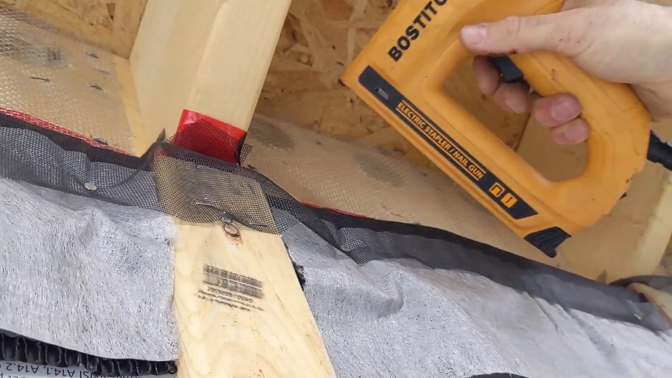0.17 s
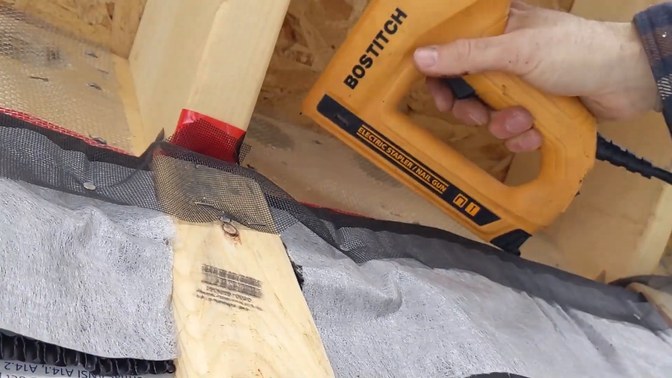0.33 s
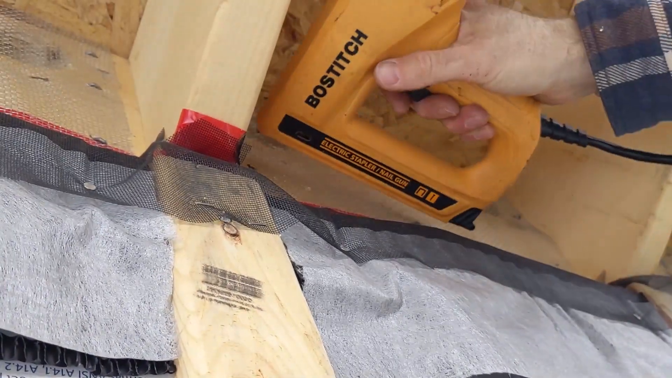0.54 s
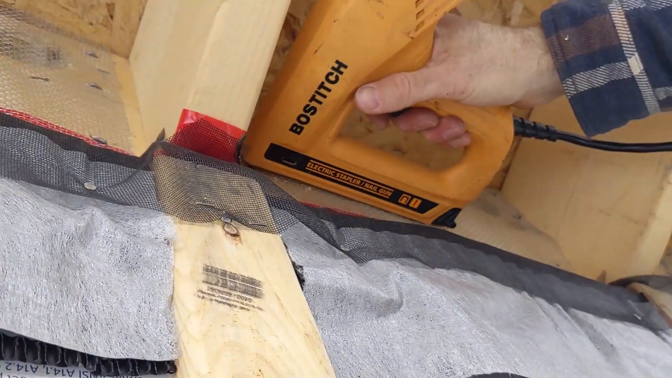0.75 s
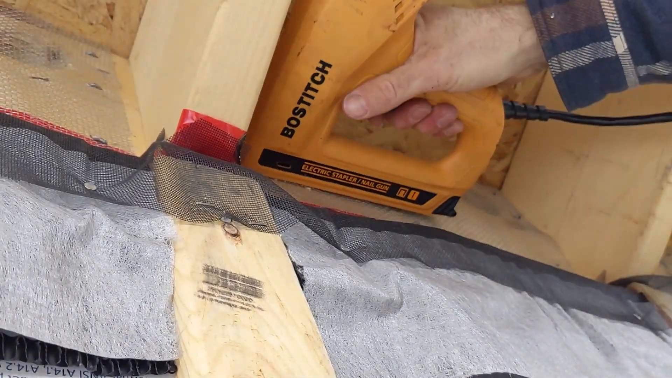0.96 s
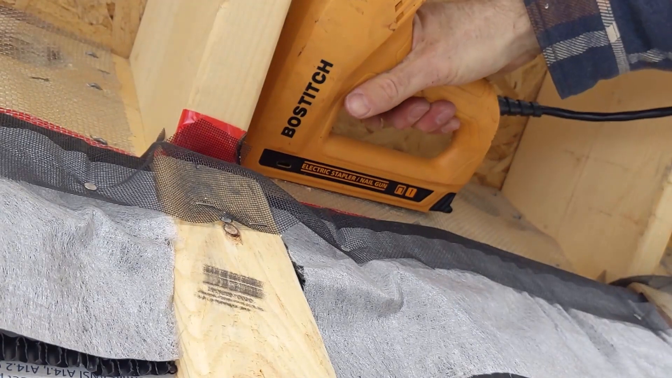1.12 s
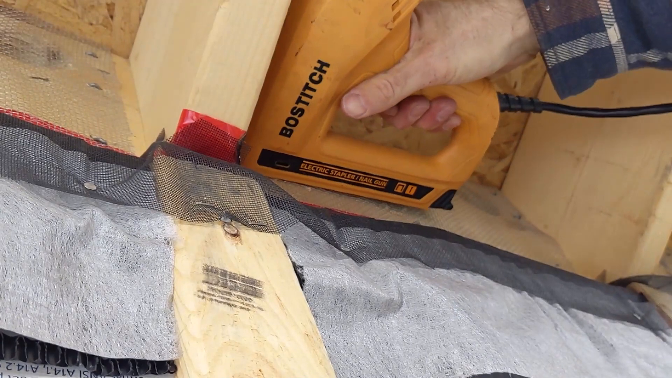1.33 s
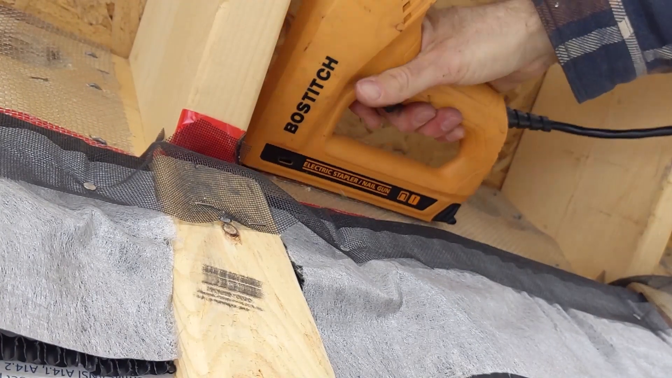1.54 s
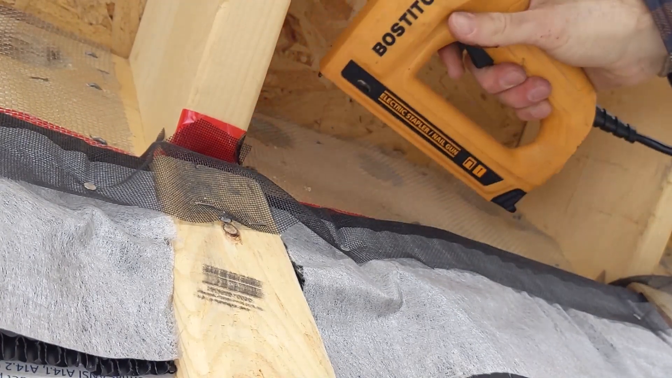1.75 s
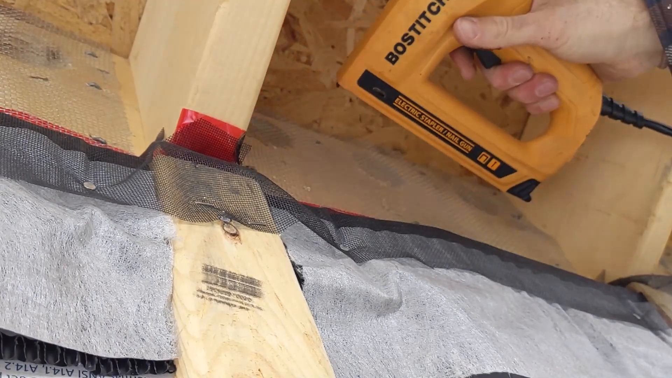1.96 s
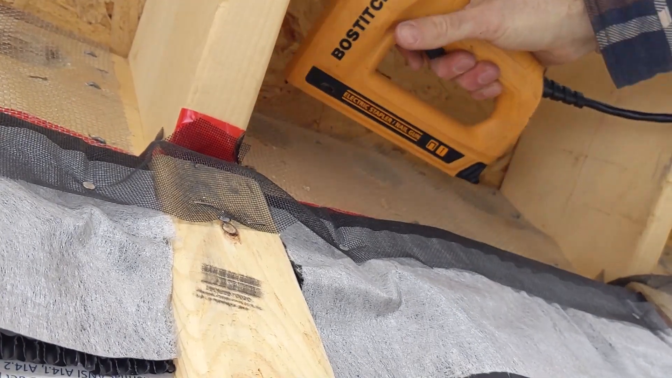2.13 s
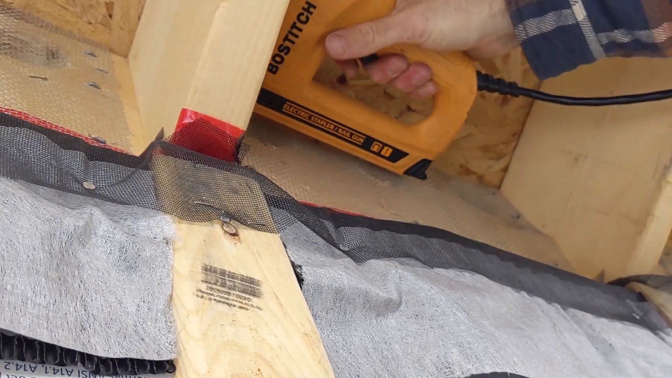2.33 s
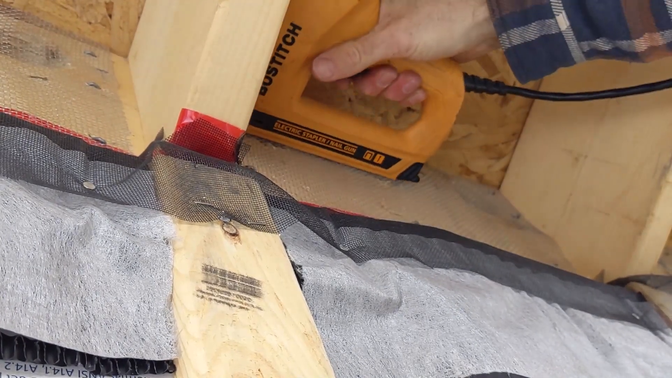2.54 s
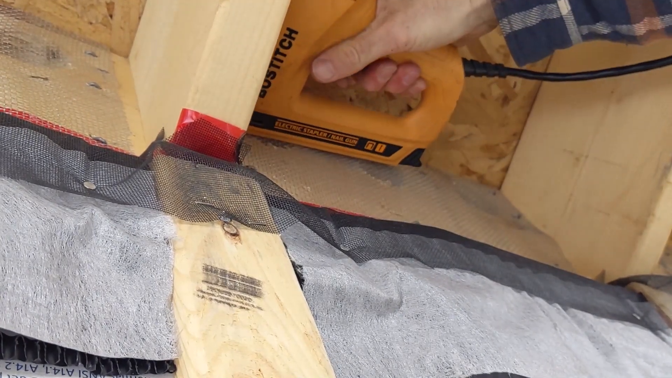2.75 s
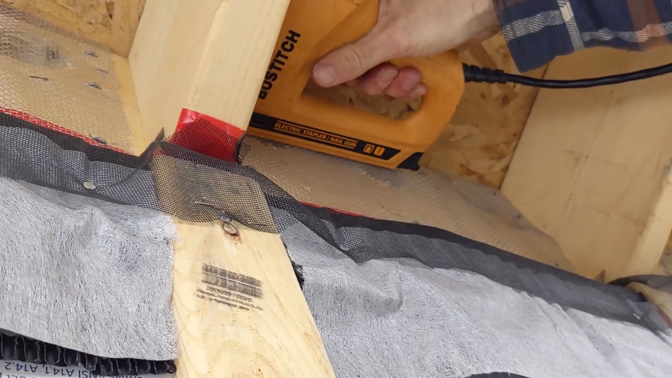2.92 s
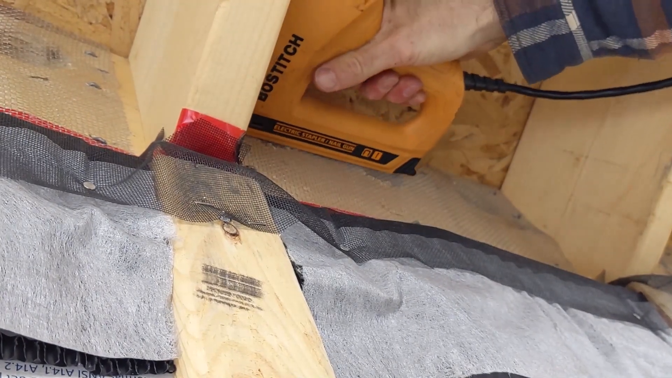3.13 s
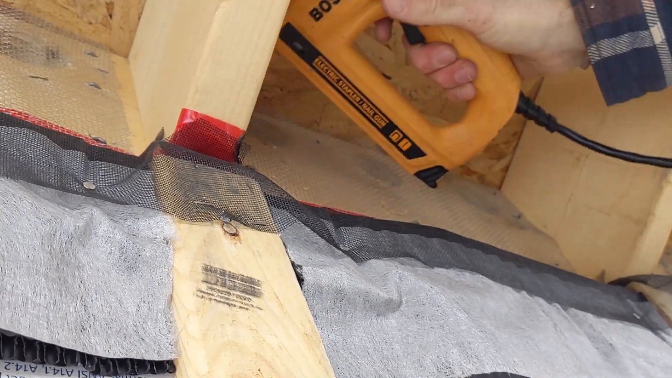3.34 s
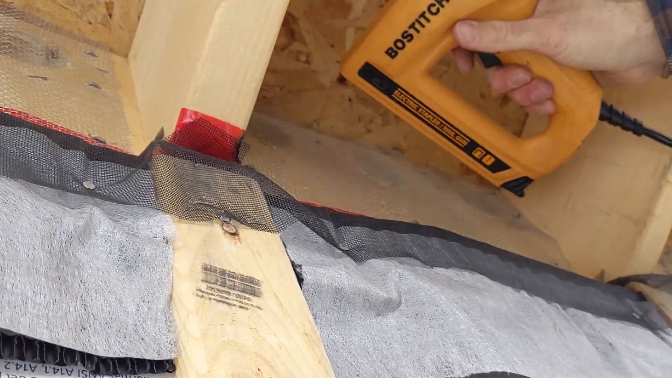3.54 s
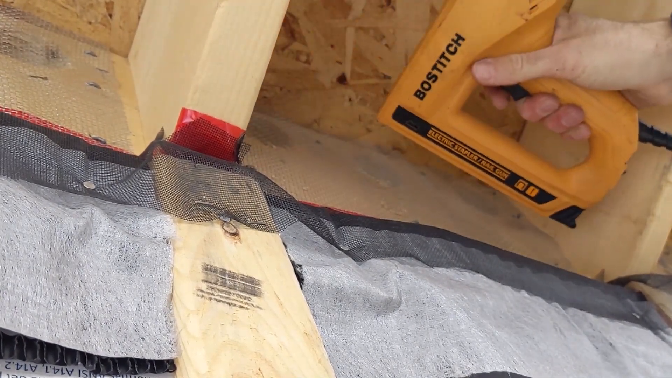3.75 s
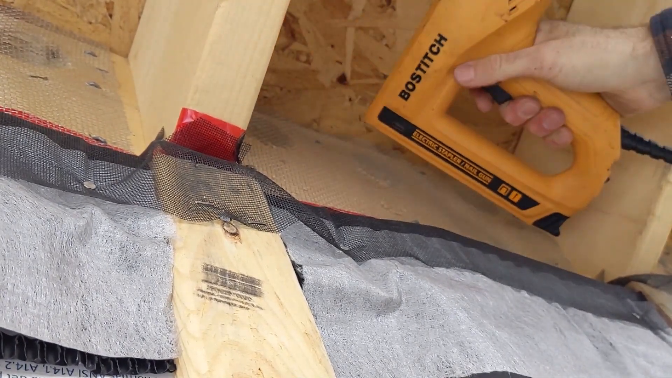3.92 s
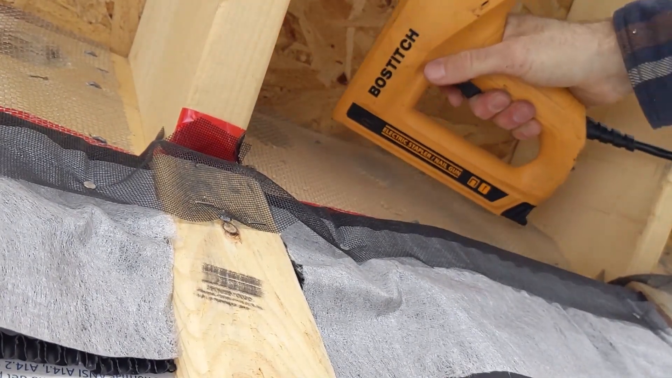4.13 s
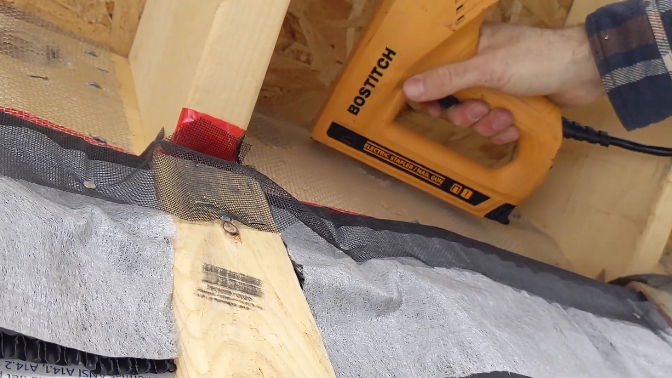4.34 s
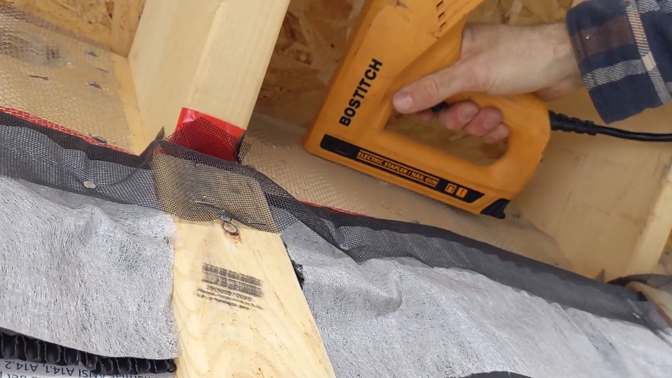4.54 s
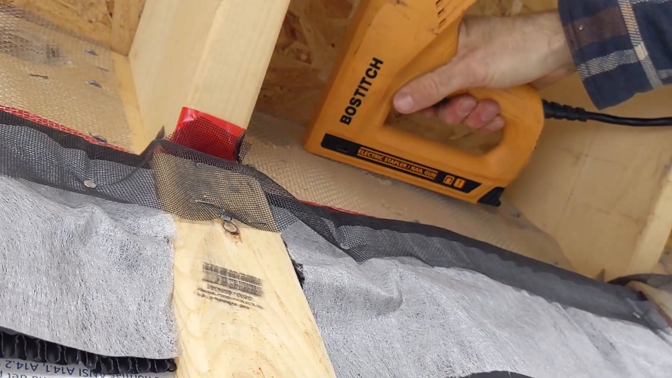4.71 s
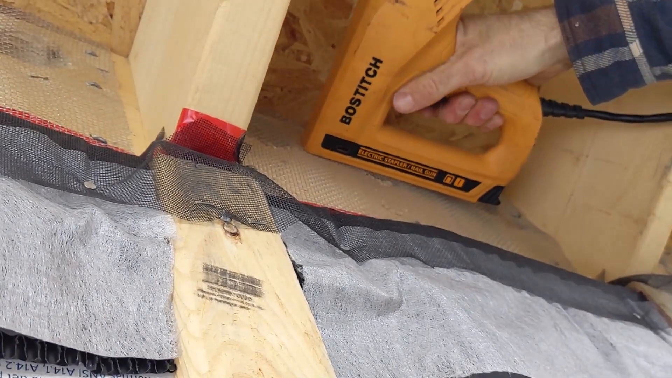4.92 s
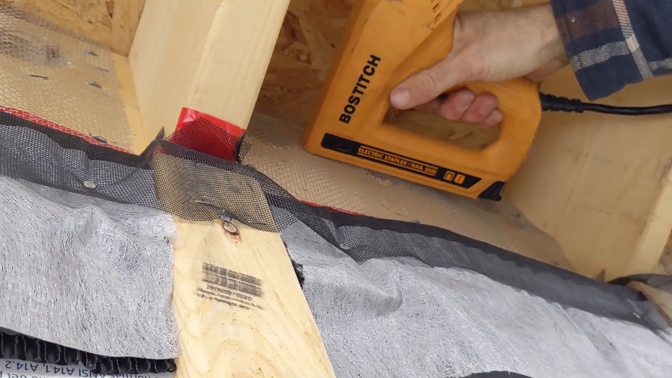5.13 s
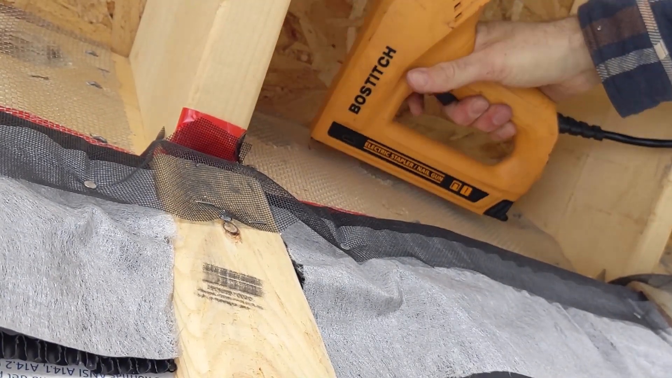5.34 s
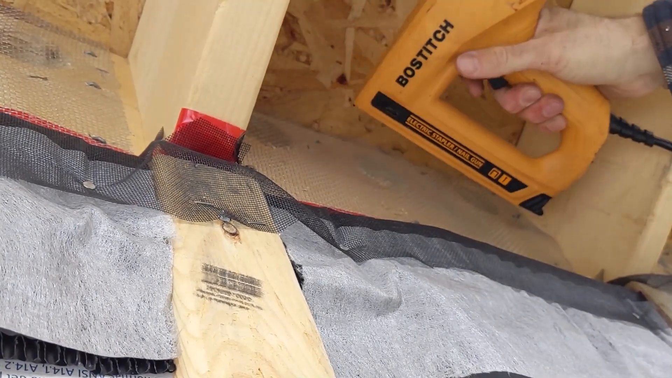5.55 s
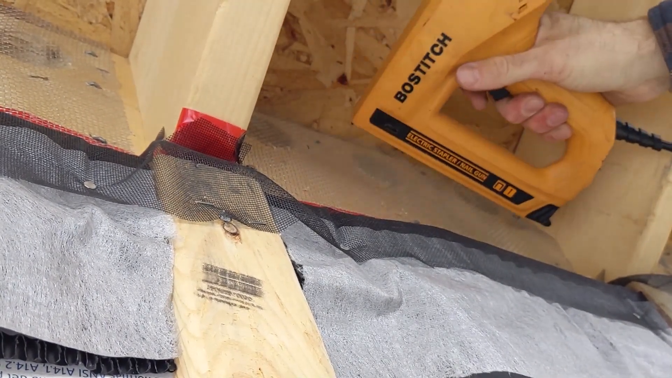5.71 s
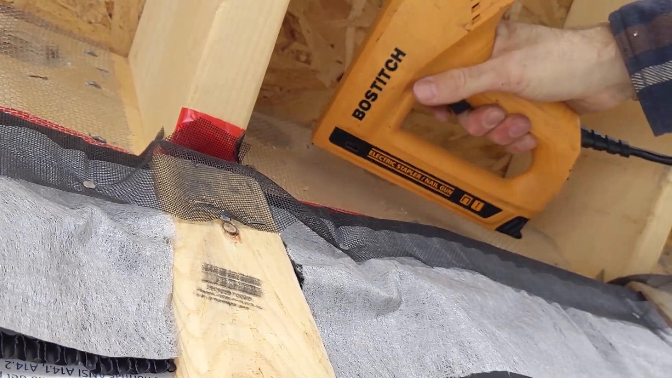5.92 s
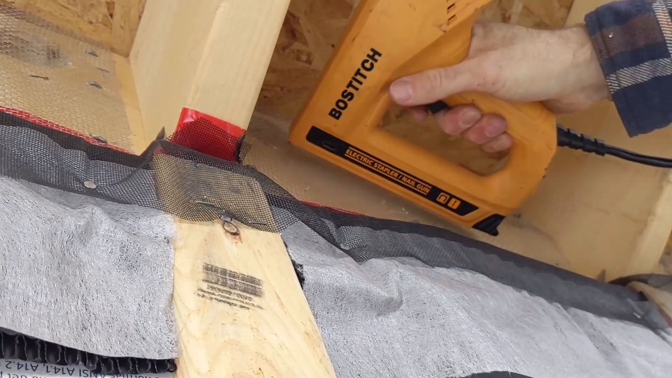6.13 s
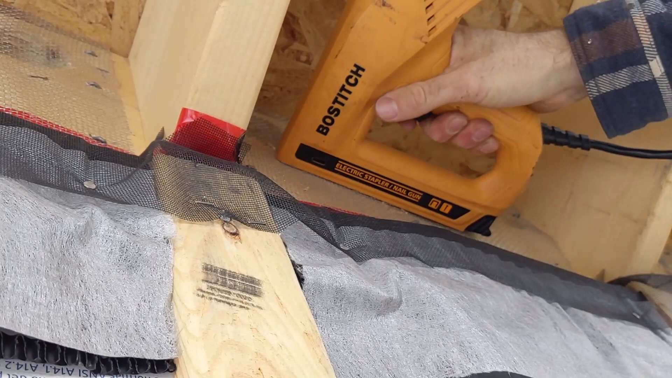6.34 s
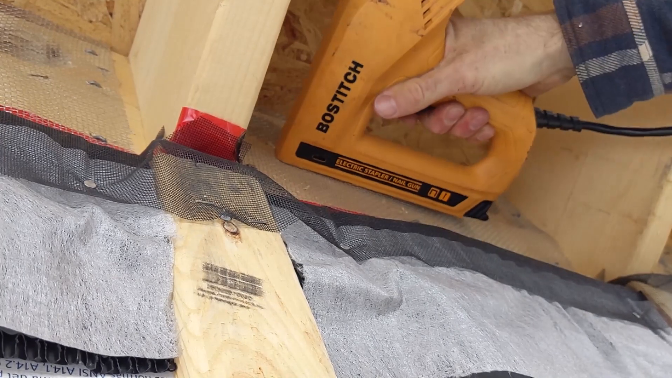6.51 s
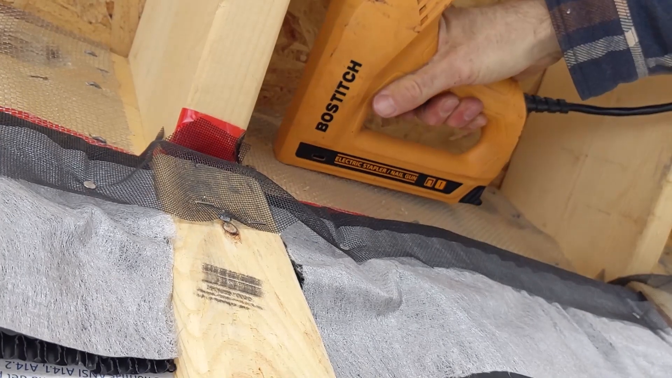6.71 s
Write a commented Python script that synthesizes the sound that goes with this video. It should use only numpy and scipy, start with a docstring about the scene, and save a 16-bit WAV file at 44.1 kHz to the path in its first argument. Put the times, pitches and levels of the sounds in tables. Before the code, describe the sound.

An electric stapler fires three sharp, loud snaps into wood, with clicks and light knocks of handling between the shots.

```python
"""An electric stapler fires three staples through mesh into a timber frame in a shed, near a two-port microphone.
First a sleeve rustles and the tool bumps the frame. The trigger spring squeaks, and at 1.4 s comes the first
shot: a trigger click, then an electromagnet (the coil) drives a strike, a rebound and a settling knock.
The tool is set down, pressed and lifted between the shots, and fires again at 3.0 s and 5.1 s.
Last come a few light knocks and low thuds of air. Outdoor rumble comes through the walls all along."""
import sys
import numpy as np
from scipy import signal
from scipy.fft import rfft, irfft, next_fast_len
from scipy.io import wavfile
from scipy.ndimage import uniform_filter1d, map_coordinates

SR = 44100
rng = np.random.default_rng(int(sys.argv[2]) if len(sys.argv) > 2 else 0)


def file_out(sig):
    """Save sig as 16-bit WAV at sys.argv[1]."""
    # one column per channel
    cols = np.atleast_2d(sig).T
    # limit, then scale
    lim = np.clip(cols, -1, 1)
    pcm = np.round(lim * 32767).astype(np.int16)
    wavfile.write(sys.argv[1], SR, pcm)


N = 298557

# The three shots. Levels in all tables are relative; a fade is the time a sound takes to drop 60 dB.
# (strike time [s], strike level [dB], trigger lead [ms], coil lead [ms], rebound delay [ms],
# rebound level [dB], settle delay [ms], settle level [dB], extra coil push [dB], panel pitch [Hz],
# panel level [dB])
SHOTS = [(1.3598, 3, 36.7, 3.76, 13.8, 1, 40, -11, -6.5, 156, -13.5),
         (3.0261, 2, 35, 5.9, 21, -5, 27.7, -8.5, -3, 87.3, -16),
         (5.1095, 3, 39.3, 2.3, 14.3, -1, 44.3, -17.5, 2, 139.4, -20.5)]
# How coil, strike, rebound and settle sound: (shell pitch [Hz], steel [dB], ring [dB], rattle [ms],
# fade [ms], left over right [dB], push on the frame [dB], push pitch [Hz], early push fade [ms])
SHOT_STAGES = [(1510, 1, -13, 6, 35, -2, -13.5, 370, 86), (2050, 1, -13, 6.1, 72, -2.5, -22, 320, 54),
               (2020, 4.2, -21.5, 2.9, 49, 1, -20.5, 290, 96),
               (1700, -3.5, -18.5, 5.8, 38, 0, -14, 390, 31)]


def staple_shots():
    """Each shot is four quick hits that also push the frame; the panel under the staple answers."""
    coil_db, panel_lag_s, panel_fade_ms = -15, .014, 100
    hits, pushes = [], []
    for (s, strike_db, _, coil_ms, rebound_ms, rebound_db, settle_ms, settle_db,
         coil_push_db, panel_hz, panel_db) in SHOTS:
        times = s + np.array([-coil_ms, 0, rebound_ms, settle_ms]) / 1000
        levels = (coil_db, strike_db, rebound_db, settle_db)
        for at, db, extra_db, stage in zip(times, levels, (coil_push_db, 0, 0, 0), SHOT_STAGES):
            *tone, push_db, push_hz, push_fade_ms = stage
            hits.append((at, db, *tone))
            pushes.append((at, push_db + extra_db, push_hz, push_fade_ms))
        pushes.append((s + panel_lag_s, panel_db, panel_hz, panel_fade_ms))
    return hits, pushes


# Tone of the plastic shell: (frequency [Hz], level [dB])
SHELL_TONE = [(180, -38), (300, 2.5), (603, 3.5), (957, -8.5), (1330, -5), (1980, -7), (2140, -5.5),
              (2710, -9), (3130, -6.5), (3390, -8.5), (7000, -17), (9100, -45), (15400, -120)]
# Bright steel clatter, coloured by the microphone's resonance near 10.5 kHz: (frequency [Hz], level [dB])
STEEL_TONE = [(2350, -33), (4000, -6.5), (4520, -2.5), (5830, -5), (7690, -7), (10300, -0.5),
              (14200, -11.5), (15300, -9.5), (16000, -14)]
# Ringing notes of the magazine rail and its stick of staples: (pitch [Hz], level [dB], fade [s])
RAIL_NOTES = [(887, -1.5, 1), (1060, -8, 0.55), (1515, -3.5, 0.2), (1940, 1, 0.081), (2440, -0.5, 0.098),
              (2868, -9, 0.38), (3140, -8.5, 0.033), (3676, 5, 0.064), (4100, -4.5, 0.092),
              (4500, -5, 0.11), (5100, 0.5, 0.041), (5485, -3, 0.084), (6420, -12.5, .05), (8200, -9, .05),
              (8400, -5.5, 0.065), (9800, -4, .05)]
# How alike the tool sounds left and right: (frequency [Hz], likeness [1 = the same])
TOOL_LIKENESS = [(300, 0.89), (1000, 0.5), (3000, 0.19), (12000, 0.043)]


def stapler_body(hits, rise_s, steel_life, steel_lead_s, chatter_db, ring_gain_db, damping_db_per_s,
                 snap_gain, scrape):
    """Each hit briefly rattles the shell and the steel, and rings the rail until the hand damps it."""
    out, t = np.zeros((2, N + SR)), np.arange(SR // 5) / SR
    rail = ringing_notes(RAIL_NOTES, t, spread=.004, count=3)
    hz = np.geomspace(150, 16000, num=30)
    for s, db, centre_hz, steel_db, ring_db, rattle_ms, fade_ms, pan_db in hits:
        fallen_db = 60 * np.maximum(1000 * t - rattle_ms, 0) / max(fade_ms, 4)
        tone = np.c_[hz, value_at(SHELL_TONE, hz) - 3.5 * np.log2(hz / centre_hz) ** 2]
        shell = stereo_noise(tone, TOOL_LIKENESS, len(t), lead_s=.0001) * pan(3) * amp(-fallen_db)
        steel = stereo_noise(STEEL_TONE, TOOL_LIKENESS, len(t), steel_lead_s) * pan(-3)
        steel *= amp(steel_db - fallen_db / steel_life)
        # loose parts chatter in lumps about a millisecond long
        chatter = amp(chatter_db * unit(uniform_filter1d(rng.standard_normal(len(t)), size=50)))
        ring = strike(rail, centre_hz, focus_db=7, stereo=0.22, thud=0.41)
        ring *= amp(ring_db + ring_gain_db - damping_db_per_s * t)
        # a short knock starts sharply, a long scrape does not
        snap = 1 + snap_gain * amp(-60 * t / 0.0086 - 2 * rattle_ms)
        onset = 1 - np.exp(-t / (rise_s + scrape * max(rattle_ms - 5, 0) / 1000))
        sound = onset * ((shell + steel) * chatter * snap + ring)
        out[:, round(s * SR):][:, :len(t)] += amp(db - 12) * sound * pan(pan_db)
    return out[:, :N]


# Ringing notes of the wooden frame and its panels: (pitch [Hz], level [dB], fade [s])
TIMBER_NOTES = [(61, -9.5, .3), (90.6, -4, .4), (131, -5.5, 0.92), (153.4, 1.5, 0.29), (217, -8, 0.37),
                (237, -4, 0.88), (277.4, -4, 0.96), (340, -4.5, 0.45), (367, -2, 0.13), (426.1, 2.5, 0.38),
                (462, -6, 0.22), (543, -6, 0.69), (651, 3, 0.073), (700.4, -12.5, .25), (980.4, -15, .3)]


def timber_frame(pushes):
    """A push rings the frame; the joint under the tool damps most of it early and the panels hum on."""
    out, t = np.zeros((2, N + SR)), np.arange(SR // 2) / SR
    frame = ringing_notes(TIMBER_NOTES, t, spread=.06, count=6)
    onset, hum = 1 - np.exp(-t / 0.0026), amp(-13 - 15 * t)
    for s, db, centre_hz, early_fade_ms in pushes:
        knock = amp(-60 * 1000 * t / early_fade_ms)
        ring = strike(frame, centre_hz, focus_db=10, stereo=0.32, thud=0.66)
        out[:, round(s * SR):][:, :len(t)] += amp(db) * onset * (knock + hum) * ring
    return out[:, :N]


# Clicks of the tool's nose, its magazine and the trigger being let go:
# (time [s], level [dB], steel [dB], ring [dB], rattle [ms])
CLICKS = [(0.873, -38, -8, -11.5, 13), (0.8807, -27, -10, -8, 2.5), (0.928, -29.5, -7.5, -11.5, 5.2),
          (1.5671, -33, -1.5, -14, 1.04), (1.577, -32.5, -16, -8, 2), (1.609, -43, 2.5, -10, 6.9),
          (1.616, -31, -22, -15, 7.5), (1.764, -48, 21.5, 14.5, 2), (1.8425, -42, -20, -7, 10.6),
          (2.1262, -56, 11, -12.5, 1.02), (2.487, -44, -12.5, -8, 11), (2.5063, -31, -9.5, -9.5, 12),
          (2.5186, -25.5, -9, -13.5, 4.9), (2.526, -32, -14, -15.5, 7.6), (2.5354, -11.5, -3, -20.5, 1.7),
          (2.587, -29.5, -9, 2, 3.6), (3.148, -45.5, 4, -8, 3.6), (3.2067, -38, -4.5, -7, 2),
          (3.216, -34.5, -13, -9, 1.1), (3.250, -51, 10.5, -12, 2.05), (3.2599, -34.5, -22, -11, 6.8),
          (3.4801, -41.5, 7.5, -14, 3.5), (3.5077, -39, -10, -17, 0.86), (3.554, -41, -11.5, -4, 2.6),
          (3.5688, -30, 6, -10, .9), (3.66, -45.5, -4.5, 0, 66), (3.6908, -50.5, 9, -15, 3),
          (4.164, -39, -4, -6, 3), (4.3338, -55, 7.5, -6, 1.5), (4.358, -36.5, -1, -11.5, 1.9),
          (4.5425, -36.5, -5, -33.5, 18.4), (4.5666, -30, -4, -12, 17), (4.5855, -10.5, -5.5, -15.5, 0.83),
          (4.632, -37.5, -1.5, -11, 16.6), (4.713, -40, -14, -13.5, 14), (4.7332, -29, -12.5, -1, 3),
          (4.736, -35, -6.5, -7, 29), (5.2979, -36.5, -2.5, -5.5, 1.9), (5.309, -38, -11, -18, 2.5),
          (5.3346, -13, -8, -13.5, 2.9), (5.371, -47, 9.5, -14, 3.8), (5.381, -36.5, -23, -8, 9.7),
          (5.5954, -45.5, 1.5, -4, 1), (5.7294, -45, -12, -0.5, 1.9), (5.7815, -54, 7, -12, 0.85),
          (5.8154, -56, 7.5, -12, 1.33), (6.338, -32, -5.5, -11, 11), (6.355, -37, 1, -17, 7.5),
          (6.512, -40.5, -24, -5.5, 31), (6.6292, -42.5, -11, 0, 7), (6.66, -47.5, -8, -8.5, 117)]
# The trigger being pulled: (level [dB], steel [dB], ring [dB], rattle [ms])
TRIGGER_CLICK = (-29, -4, -10.5, 0.6)
# Soft bumps against the frame: (time [s], level [dB], pitch [Hz])
SOFT_BUMPS = [(.051, -39.5, 266), (0.236, -35.5, 660), (.239, -36, 295), (0.327, -36, 108.7),
              (.879, -39, 420), (.963, -37.5, 378.3), (0.966, -37, 90), (4.573, -22.5, 359.7),
              (4.587, -25.5, 366), (6.36, -39.5, 400), (6.422, -36, 352.5), (6.443, -32, 72)]


def handling():
    """The handled tool clicks and nudges the frame; the trigger clicks before each shot."""
    pan_db, nudge_db, nudge_hz, push_fade_ms = -2.5, -17, 480, 51
    triggers = [(s - lead_ms / 1000, *TRIGGER_CLICK) for s, _, lead_ms, *_ in SHOTS]
    hits = []
    for s, db, steel_db, ring_db, rattle_ms in CLICKS + triggers:
        centre_hz = np.clip(3550 * 2 ** (steel_db / 12), 1600, 5600)  # more steel sounds brighter
        fade_ms = 52 * amp(0.29 * ring_db) + 1.5 * rattle_ms
        hits.append((s, db, centre_hz, steel_db, ring_db, rattle_ms, fade_ms, pan_db))
    nudges = [(s, db + nudge_db, nudge_hz) for s, db, *_ in CLICKS]
    return hits, [(*push, push_fade_ms) for push in nudges + SOFT_BUMPS]


# The trigger spring's lower note: (time [s], pitch [Hz], level [dB])
SPRING_NOTE = [(1.2, 5655, -79.5), (1.26, 6050, -64), (1.31, 6.1e3, -69), (1.325, 6.1e3, -66.5)]


def spring_squeak():
    """The trigger spring gives a thin, unsteady note with a louder one above it."""
    hz, db = curves(SPRING_NOTE)
    t = np.arange(N) / SR
    phase = 2 * np.pi * np.cumsum(hz * (1 + .02 * wobble(1500))) / SR
    sounding = (t > SPRING_NOTE[0][0]) & (t < SPRING_NOTE[-1][0])
    return sounding * amp(db - 7 + 5 * wobble(200)) * (np.sin(phase) + amp(8) * np.sin(1.89 * phase))


# How long the shed echoes: (frequency [Hz], fade [s])
ECHO_FADE = [(100, 0.93), (500, 0.58), (2000, 0.31), (6000, 0.19), (14000, 0.16)]
# How alike echo and background sound left and right: (frequency [Hz], likeness [1 = the same])
ROOM_LIKENESS = [(25, .3), (60, 0.98), (180, 0.94), (550, .35), (1650, -.1), (15000, 0.021)]


def shed_echo(x):
    """Low notes echo longest. Each half second gets a fresh random echo, so no one note keeps ringing."""
    out, step = np.zeros((2, N + 2 * SR)), SR // 2
    for at in range(0, N, step):
        hz, t, noise = signal.stft(rng.standard_normal((2, SR * 3 // 5)), SR, nperseg=256)
        width = stereo_width(ROOM_LIKENESS, hz)[:, None]
        stereo = noise[0] * np.cos(width) + noise[1] * np.sin(width) * [[[1]], [[-1]]]
        fade = amp(-60 * t / value_at(ECHO_FADE, hz)[:, None])
        tail = signal.istft(stereo * fade, SR, nperseg=256)[1]
        echo = signal.fftconvolve(x[:, at:at + step], tail / np.linalg.norm(tail[0]), axes=1)
        out[:, at:at + echo.shape[1]] += echo
    return out[:, :N]


# How loudly the sleeve rustles: (time [s], level [dB])
SLEEVE_LEVELS = [(0.0, -56), (0.13, -47.5), (0.28, -47), (0.53, -54), (0.94, -62), (1.26, -68),
                 (1.47, -61.5), (1.8, -67.5), (2.13, -59), (2.3, -66.5), (3.04, -75.5), (3.18, -60.5),
                 (3.6, -55.5), (3.92, -71.5), (4.56, -73), (4.73, -61), (4.86, -64), (5.08, -81),
                 (5.24, -60), (5.4, -73), (6.3, -71.5), (6.77, -64.5)]
# Rubbing cloth, coloured by the microphone's resonance near 11 kHz: (frequency [Hz], level [dB])
CLOTH_TONE = [(400, -31), (700, -10), (1060, -6), (1420, -12), (2880, -10), (3700, -9), (5000, -10),
              (7200, -19.5), (8500, -10.5), (10300, -9), (11300, -9), (12300, -12.5), (14900, -17.5),
              (16300, -25)]


def sleeve_rustle():
    """Cloth rubs as the arm moves, making an uneven hiss."""
    db = curves(SLEEVE_LEVELS)[0] + 0.54 * wobble(12) + 0.59 * wobble(120)
    return amp(db) * patchy(stereo_noise(CLOTH_TONE, ROOM_LIKENESS, N), depth_db=1.5)


# How loud the low background is: (time [s], rumble [dB], draught [dB])
LOW_LEVELS = [(0.0, -51, -62), (.3, -52.5, -56), (.65, -57, -55.5), (.89, -52.5, -45.5), (1.2, -54.5, -63),
              (2.8, -52.5, -63), (3.4, -54.5, -63.5), (4.1, -51, -68.5), (5.0, -53, -60),
              (5.55, -54, -57.5), (5.9, -48.5, -43), (6.3, -54, -55), (6.47, -48, -41), (6.64, -51.5, -54),
              (6.77, -50.5, -41)]
# Tone of the outdoors through the walls: (frequency [Hz], level [dB])
RUMBLE_TONE = [(26, -30), (45, 5), (173, -2), (253, -21), (280, -29), (313, -24.5), (400, -21), (520, -47),
               (880, -120)]
# Tone of slow air thudding on the microphone: (frequency [Hz], level [dB])
DRAUGHT_TONE = [(8, -17), (25, 2.5), (45, -4), (80, -15), (200, -59)]


def rumble_and_draught():
    """Outdoor rumble throbs through the walls; slow air hits the microphone, with a puff at each shot."""
    rumble_db, draught_db = curves(LOW_LEVELS)
    throb_db = 0.83 * wobble(2.6) + 1.8 * wobble(37)
    rumble = amp(rumble_db + throb_db) * stereo_noise(RUMBLE_TONE, ROOM_LIKENESS, N)
    puff_db, rise_s, fall_s = -44.5, .02, .05
    since_shot = np.maximum(np.arange(N) / SR - np.array(SHOTS)[:, :1], 0)
    puffs = amp(puff_db) * np.sum((1 - np.exp(-since_shot / rise_s)) * np.exp(-since_shot / fall_s), axis=0)
    return rumble + (amp(draught_db) + puffs) * stereo_noise(DRAUGHT_TONE, [(30, 0.22)], N)


# Tone of the background hush: (frequency [Hz], level [dB])
HUSH_TONE = [(120, -30.5), (200, -4), (283, -11.5), (500, -8.5), (748, -12), (1180, -11), (1300, -15.5),
             (1940, -15.5), (7390, -32), (10300, -34.5), (16000, -44.5)]


def air_hush():
    """A faint hush of air that wavers a little."""
    return amp(-58 + .7 * wobble(6)) * stereo_noise(HUSH_TONE, ROOM_LIKENESS, N)


def amp(db):
    """Turn decibels into a gain."""
    return 10 ** (np.asarray(db) / 20)


def pan(db):
    """Two gains that put the left side db above the right."""
    return amp([[db / 2], [-db / 2]])


def unit(x):
    """Scale to an average strength (rms) of 1."""
    return x / np.sqrt(np.mean(x ** 2) + 1e-20)


def value_at(points, hz):
    """Read between the rows of a frequency table, on a log scale."""
    known_hz, values = np.transpose(points)
    return np.interp(np.log(hz + 1), np.log(known_hz + 1), values)


def curves(rows):
    """One value per sample for each column after the time."""
    times, *columns = np.transpose(rows)
    return [np.interp(np.arange(N) / SR, times, column) for column in columns]


def wobble(rate):
    """A smooth random curve through rate points a second."""
    return map_coordinates(rng.standard_normal(int(N * rate / SR) + 4), [np.arange(N) * rate / SR])


def stereo_width(likeness, hz):
    """A mixing angle: 0 makes left and right the same."""
    return np.arccos(np.clip(value_at(likeness, hz), -1, 1)) / 2


def stereo_noise(tone, likeness, size, lead_s=0):
    """Noise with the given tone; the left side hears it lead_s earlier."""
    padded = next_fast_len(size)
    hz = np.fft.rfftfreq(padded, 1 / SR)
    width = stereo_width(likeness, hz)
    noise = rfft(rng.standard_normal((2, padded))) * amp(value_at(tone, hz))
    mid, side = noise * [np.cos(width), np.sin(width)]
    shift = np.exp(1j * np.pi * hz * lead_s)
    return unit(irfft([(mid + side) * shift, (mid - side) / shift], padded)[:, :size])


def patchy(x, depth_db):
    """Make random patches of pitch and time louder or softer."""
    spectrum = signal.stft(x, nperseg=256)[2]
    patches = uniform_filter1d(rng.standard_normal(spectrum.shape[1:]), size=4, axis=0)
    patches = uniform_filter1d(patches, size=14, axis=1)
    return unit(signal.istft(spectrum * amp(depth_db * unit(patches)), nperseg=256)[1][:, :N])


def ringing_notes(table, t, spread, count):
    """Turn each note into a cluster of close, fading waves; return pitches and waves."""
    hz, db, fade_s = np.repeat(table, count, axis=0).T[..., None]
    hz = hz * (1 + spread * rng.standard_normal(hz.shape))
    return hz[:, 0], amp(db - 60 * t / fade_s) * np.exp(2j * np.pi * hz * t)


def strike(notes, centre_hz, focus_db, stereo, thud):
    """Ring the waves at random strengths, weaker away from centre_hz; thud pulls them into step."""
    hz, waves = notes
    shared, side = rng.standard_normal((2, len(hz))) + 1j * rng.standard_normal((2, len(hz)))
    focus = amp(-focus_db * np.log2(hz / centre_hz) ** 2)
    weight = (shared - 1j * thud + stereo * side * [[1], [-1]]) * focus
    return (weight @ waves).real / np.linalg.norm(weight[0])


def scene():
    """Mix the stapler, the frame, their echo and the background in stereo."""
    shot_hits, shot_pushes = staple_shots()
    click_hits, handling_pushes = handling()
    shots = stapler_body(shot_hits, rise_s=0.002, steel_life=0.48, steel_lead_s=.0004, chatter_db=2,
                         ring_gain_db=2, damping_db_per_s=250, snap_gain=0.14, scrape=0)
    clicks = stapler_body(click_hits, rise_s=0.00053, steel_life=0.75, steel_lead_s=.0001, chatter_db=3.5,
                          ring_gain_db=8, damping_db_per_s=130, snap_gain=1.6, scrape=0.43)
    frame = timber_frame(shot_pushes + handling_pushes)
    echo = amp(-20.5) * shed_echo(shots + amp(5.5) * clicks + amp(6) * frame)
    squeak = spring_squeak()
    background = rumble_and_draught() + sleeve_rustle() + air_hush()
    return shots + clicks + frame + echo + squeak + background * pan(-1.4)


def record(dry):
    """The microphone's input rounds off loud peaks and cuts the highest treble."""
    ceiling, top_hz, slope_hz = .85, 16250, 300
    rounded = dry / (1 + np.abs(dry / ceiling) ** 5) ** (1 / 5)
    size = next_fast_len(N + 8192)
    edge = np.clip((top_hz - np.fft.rfftfreq(size, 1 / SR)) / slope_hz, 0, 1)
    return irfft(rfft(rounded, size) * np.sin(edge * np.pi / 2) ** 2, size)[:, :N]


dry = scene()
out = record(dry)
file_out(out)
```